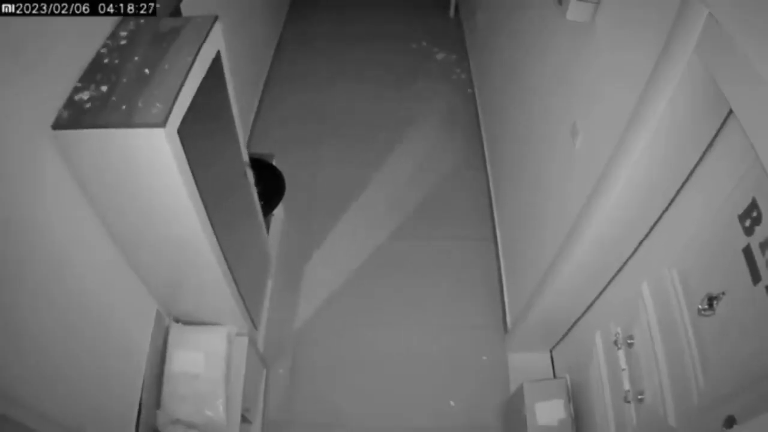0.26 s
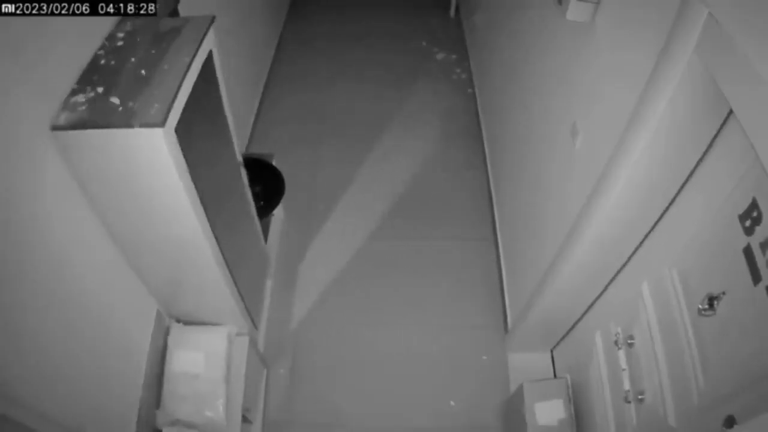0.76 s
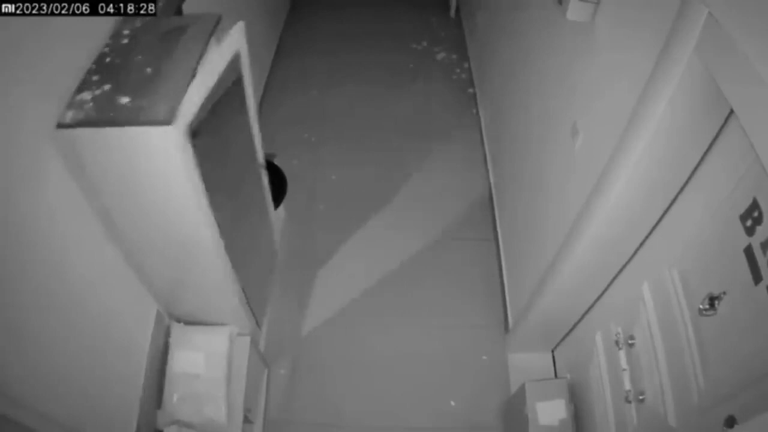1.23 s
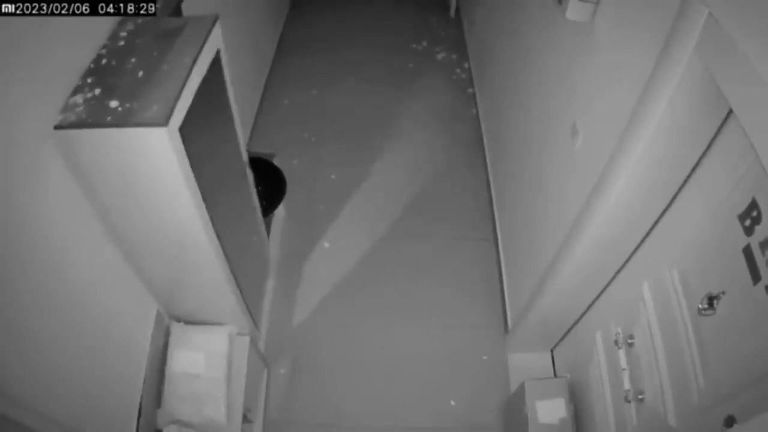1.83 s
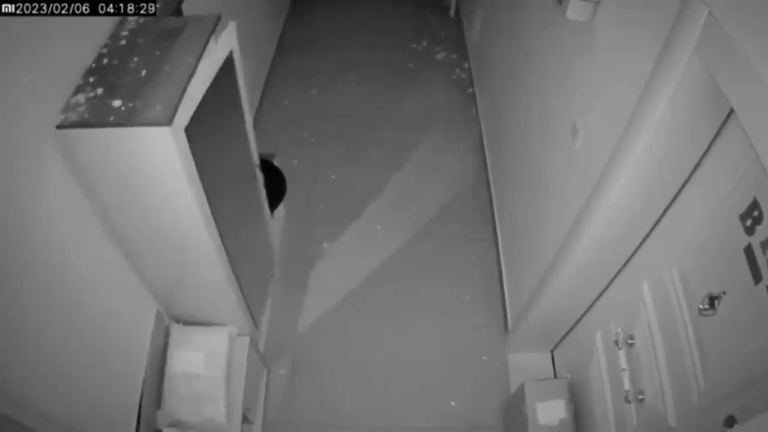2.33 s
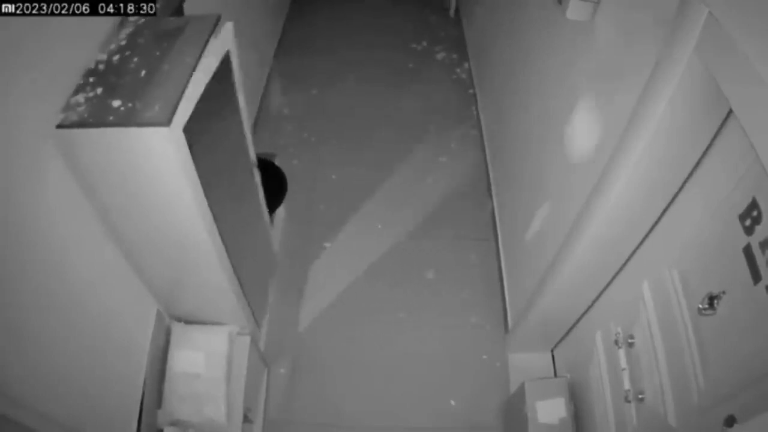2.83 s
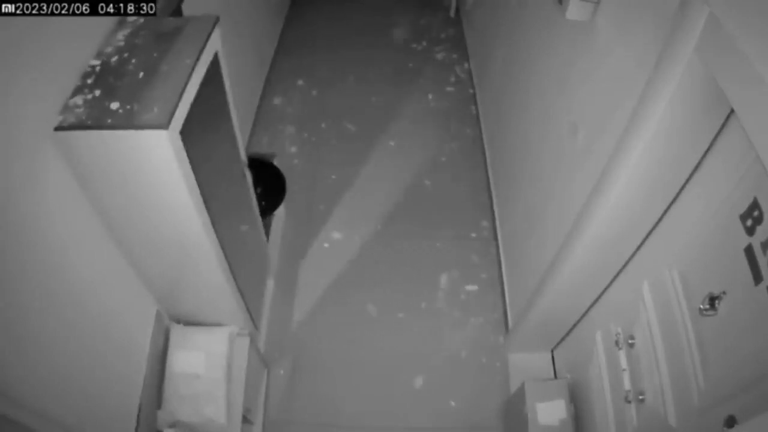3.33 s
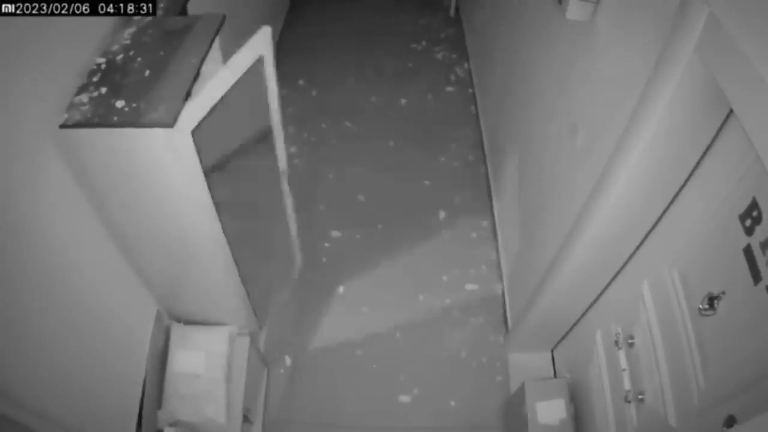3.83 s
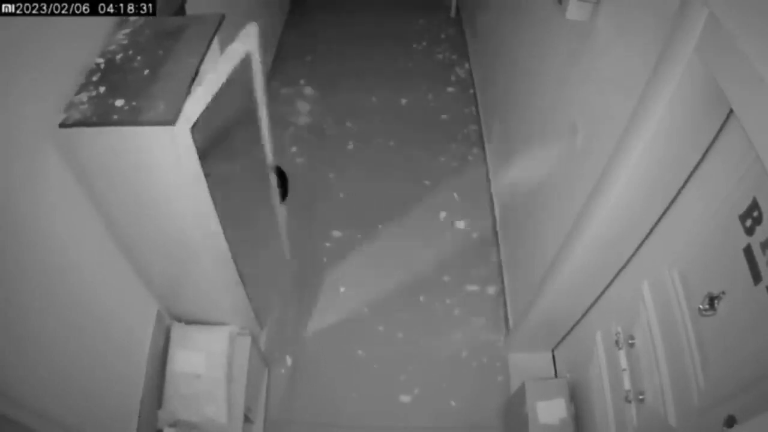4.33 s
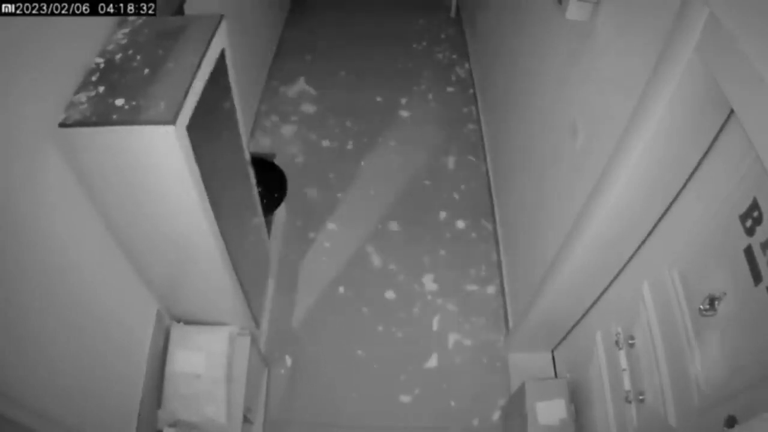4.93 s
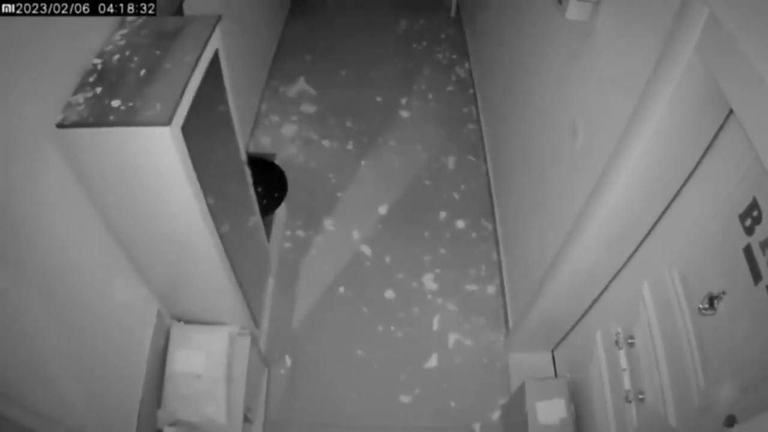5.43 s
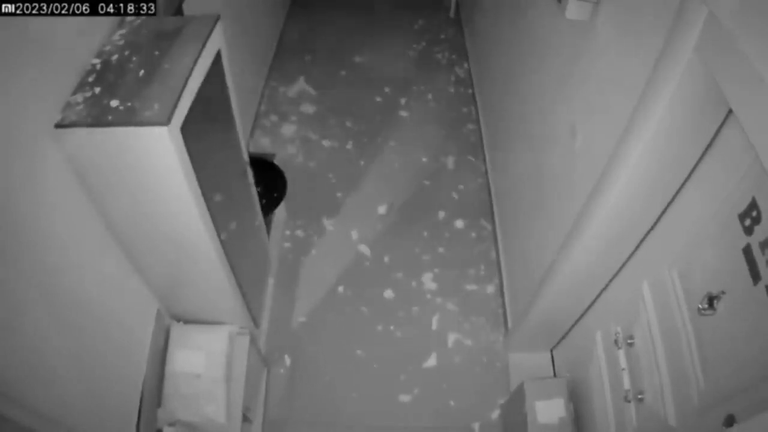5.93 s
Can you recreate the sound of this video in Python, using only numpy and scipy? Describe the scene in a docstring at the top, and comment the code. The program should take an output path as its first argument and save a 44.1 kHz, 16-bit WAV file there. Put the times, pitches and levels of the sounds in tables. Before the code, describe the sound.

A security camera in a bare, echoing hallway hears a strong earthquake. A dull thud and low rumble start at once, with loose doors and fittings rattling down the hall. Around 0.4 s the building lurches, plaster begins to crack and patter, and hard chips tick sharply nearby, again at 1.1 s. At 1.3 s furniture thuds and crashes against a wall; the hardest jolt hits at 1.7-1.9 s, booming, clattering and overloading the microphone. More heavy thuds follow near 2.4 and 3.0 s, with dry plaster snaps at 2.9 and 3.35 s and streams of crumbs. Bright ticks come at 3.65 and 4.3-4.5 s. Rumble eases somewhat, then a wide crash bursts at 4.7-4.85 s with long scraping. A sharp chip clicks at 5.3 s; a last lurch, thud, rattling and dragging scrapes run from 5.6 s to the end. Mono, band-limited, compressed.

```python
"""An earthquake in a hallway with bare walls, heard by a small mono security camera on the wall.
A thud and rumble open it: random jolts ring building modes, and lurches swell them, hardest at 1.7 s.
Filtered bursts of tiny contacts soon crack and pour plaster; decaying sines tick as chips land close by.
Furniture crashes come near 1.3, 1.8 and 4.7 s as wide bursts; long scrapes trail to the end.
Rattle and grit run throughout from the hall; the loudest jolts overload the camera's input."""
import sys
import numpy as np
from scipy import signal
from scipy.fft import rfft, irfft, next_fast_len
from scipy.io import wavfile

SR = 44100
rng = np.random.default_rng(int(sys.argv[2]) if len(sys.argv) > 2 else 0)


def wav_record(signal):
    """Record a signal, one row per channel, as 16-bit PCM in the file named by sys.argv[1]."""
    frames = np.transpose(np.atleast_2d(signal))
    bounded = np.clip(frames, -1, 1)
    # unit amplitude maps onto the largest positive 16-bit level
    quanta = np.round(bounded * 32767).astype(np.int16)
    wavfile.write(sys.argv[1], SR, quanta)


N = 272392  # samples, about 6.2 s

# Trembling between the lurches, walls and furniture against floor:
# time_s, walls_level_db, boom_level_db
TREMBLING = [(0, -24.5, -36.5), (.8, -35, -51.5), (.97, -30, -48), (1.22, -29, -39.5), (1.68, -37.5, -44.5),
             (2.15, -25, -35), (2.72, -22, -34.5), (2.88, -30.5, -41.5), (3.48, -37, -48.5),
             (3.75, -25.5, -38.5), (4.15, -33, -52.5), (4.65, -34, -47.5), (5.25, -38, -60),
             (5.55, -35, -49), (6.18, -32, -46)]
# Lurches of the building, floor boom relative to the walls:
# start_s, walls_level_db, hold_s, boom_over_walls_db
BUILDING_LURCHES = [(0.367, -26, .11, -3.5), (1.297, -24, 0.068, -6), (1.423, -26, 0.095, -16),
                    (1.732, -14, 0.22, -8.5), (2.289, -20.5, 0.13, -7), (2.458, -21.5, .03, -0.5),
                    (2.937, -21.5, 0.098, -2.5), (3.12, -22.5, 0.092, -8.5), (3.542, -22.5, 0.04, -11),
                    (4.383, -24.5, 0.036, -9), (5.615, -24, 0.029, -13), (5.824, -20.5, 0.079, -8.5)]
# Resonances of floor, walls and cabinet: centre_hz, width_hz, level_db
BUILDING_MODES = [(65.9, 1.5, 6), (82, 6.9, -11), (95, 14, -4.5), (114, 8.8, -4), (139, 31, 0.5),
                  (167.6, 1.7, -7), (183.3, 39, -2), (222.8, 18, 1.5), (251.3, 17, 3.5), (304, 75, 2.5),
                  (364, 17, -5.5), (410.7, 19, 1.5), (460, 96, -12.5), (714, 130, -12), (935, 130, -34)]
# Heavy blows of furniture and doors, level before a common trim, low roll-off of the blow:
# start_s, relative_level_db, t60_s, lowest_hz
HEAVY_THUDS = [(0, -10.5, 0.19, 150), (1.305, -9, 0.21, 83), (1.764, -6.5, 0.31, 100),
               (1.825, -16, 0.94, 40), (2.394, -7.5, 0.37, 210), (2.489, -15, 0.57, 18),
               (2.991, -15, 0.14, 37), (3.042, -11, 0.18, 61), (4.705, -9.5, 0.15, 230),
               (4.833, -13.5, 0.4, 49), (5.317, -17.5, 0.078, 120), (5.9, -15, 0.22, 120)]
# Furniture against the walls, level before a common trim:
# start_s, relative_level_db, centre_hz, t60_s
WALL_CRASHES = [(1.298, -4.5, 1360, .13), (1.77, -6, 2100, 0.18), (1.843, -14.5, 1424, 0.26),
                (4.704, -16.5, 1090, 0.2), (4.835, -6, 2440, 0.28)]
# Plaster and fittings cracking, plus two narrow ringing rows near 4.4 and 5.3 s where chips land and ring on,
# level before a common trim: # start_s, relative_level_db, centre_hz, width_octaves, t60_s
PLASTER_CRACKS = [(.181, -18, 2480, 0.24, 0.042), (0.611, -14, 2620, 3.1, 0.077),
                  (.613, -16, 1670, 0.24, 0.093), (.766, -17.5, 3500, 0.67, 0.19),
                  (0.944, -24, 2200, 0.21, .16), (.975, -28.5, 7100, 0.099, 0.33),
                  (1.397, -16.5, 2170, 0.62, 0.082), (2.315, -24.5, 4200, 1.6, 0.075),
                  (2.365, -14.5, 2750, 0.53, 0.041), (2.913, -9.5, 3550, 0.44, 0.058),
                  (2.956, -16, 3800, 0.38, 0.054), (3.162, -19, 5000, 0.35, 0.019),
                  (3.354, -10, 2380, 0.64, 0.11), (3.44, -18, 4000, 1.4, 0.17),
                  (3.598, -22.5, 2880, 1.5, .17), (4.053, -23.5, 5470, 0.59, 0.1),
                  (4.311, -19, 4500, 0.66, 0.052), (4.438, -20, 5400, .14, 0.25),
                  (4.821, -15, 3000, 0.17, 0.024), (5.165, -22.5, 2500, 0.63, .2),
                  (5.314, -20, 1800, 0.98, 0.064), (5.333, -22.5, 5000, 0.12, 0.23),
                  (5.798, -22, 3300, 1.2, 0.1)]
# Plaster pouring down, level before a common trim: start_s, relative_level_db, centre_hz
PLASTER_SPILLS = [(.363, -14.5, 6000), (.46, -22.5, 3000), (2.117, -20.5, 4000), (2.501, -23.5, 3650),
                  (2.693, -20.5, 3860), (2.863, -22, 4230), (3.2, -22.5, 2650), (3.72, -22.5, 3500),
                  (3.865, -21.5, 3280), (4.517, -18.5, 5400), (5.639, -24.5, 2430), (6.004, -19.5, 2750)]
# Furniture dragging over the floor, level before a common trim:
# start_s, relative_level_db, centre_hz, width_octaves, t60_s
FLOOR_SCRAPES = [(0.201, -23.5, 1806, 0.22, 0.092), (0.796, -25, 1830, 0.21, 0.22),
                 (1.42, -22.5, 1490, 0.48, 0.56), (3.43, -25, 1400, 0.3, .16),
                 (3.595, -23, 910, 0.32, 0.13), (4.33, -25, 1130, .4, 0.54),
                 (4.712, -17.5, 1950, 0.37, 0.32), (4.7, -21, 930, 0.088, 0.29),
                 (4.765, -20, 1000, 0.18, 0.62), (4.879, -20.5, 2060, .45, 1), (5.659, -23, 1790, .3, 1),
                 (5.8, -26.5, 1750, .25, .9), (6.03, -23.5, 2530, 0.39, 0.57),
                 (6.11, -22.5, 1670, 0.57, .65)]
# Hard chips landing close by: start_s, level_db, ring_hz, skitter_t60_s
HARD_CHIPS = [(0.382, -8.5, 5840, 0.0054), (0.393, -1, 5500, 0.0031), (1.092, 2.5, 6550, 0.04),
              (1.093, -9.5, 4630, 0.011), (3.652, 3, 5900, 0.018), (3.653, -4, 4000, 0.048),
              (4.314, -5.5, 4340, 0.0043), (4.438, -7.5, 5800, 0.0077), (4.537, -12, 5270, 0.0057),
              (5.327, 3.5, 4990, 0.024)]
# How hard loose doors and fittings chatter: time_s, level_db
CHATTER_LEVEL = [(0, -36.5), (.14, -39), (.35, -32), (.7, -31), (1.02, -31), (1.25, -31), (1.68, -33.5),
                 (2.05, -32.5), (2.5, -28), (2.84, -31.5), (3.32, -33.5), (3.55, -32), (3.96, -26),
                 (4.63, -30), (5.02, -25), (5.42, -37), (5.76, -23), (6.18, -38)]
# Colour of that chatter: frequency_hz, gain_db
CHATTER_COLOUR = [(100, -45), (250, -21.5), (450, -3), (700, -2.5), (950, 1.5), (1250, -2.5), (1850, 1.5),
                  (2800, -1), (4000, -7), (7000, -31)]
# How much fine plaster comes down: time_s, level_db
PLASTER_LEVEL = [(.13, -45), (.35, -31), (.75, -28), (1.05, -34), (1.35, -30.5), (1.62, -43), (2.05, -41),
                 (2.22, -32), (2.62, -33.5), (3.0, -29.5), (3.32, -36), (3.96, -29.5), (4.63, -34.5),
                 (5.05, -36), (5.46, -38.5), (5.68, -28), (5.97, -41), (6.18, -50)]
# Colour of the fine plaster: frequency_hz, gain_db
PLASTER_COLOUR = [(500, -55), (1200, -42), (2500, -7.5), (3600, 1), (5000, 2), (6300, 3.5), (7400, -10.5)]
# Reverberation of the hallway: frequency_hz, t60_s
HALL_DECAY = [(100, 0.54), (1000, 0.45), (3000, 0.39), (7000, 0.2)]
# Tone of the camera after its input, sloping down towards the treble: frequency_hz, gain_db
CAMERA_TONE = [(100, 1), (700, 1), (2000, -1), (5000, -2.5), (7000, -3)]

TOP_HZ = 7250  # upper edge of the camera's band and of the bursts
BOOM_TOP_HZ = 109  # the floor carries the modes below this, the walls those above
LURCH_RISE_S, LURCH_T60_S = 0.05, 0.45
# Rise as a share of the t60: longer blows also build up more slowly
THUD_RISE_SHARE, CRASH_RISE_SHARE, CRACK_RISE_SHARE = 0.018, 0.057, 0.021
CRASH_OCTAVES = 0.84
SPILL_RISE_S, SPILL_T60_S, SPILL_OCTAVES = 0.013, 0.36, 0.4
SCRAPE_RISE_S = 0.019
# Snap of the first contact against all the crumbs, and the rise time over which it fades
CRACK_SNAP, SNAP_FADE_S = 0.7, 0.0019
# After every break the larger pieces settle: later, lower, weaker and for longer
SETTLE_LAG_SHARE, SETTLE_PITCH_SHARE, SETTLE_STRETCH = 0.15, 0.65, 1.4
SETTLE_DB, SETTLE_RISE_S = -13, 0.0093


def amp(db):
    """Decibels to gain."""
    return 10 ** (np.asarray(db) / 20)


def unit(x):
    """Scale to rms 1."""
    return x / np.sqrt(np.mean(x ** 2) + 1e-20)


def along(points, hz):
    """Read (Hz, value) points on a log-frequency axis."""
    point_hz, values = np.transpose(points)
    return np.interp(np.log(hz + 1), np.log(point_hz), values)


def curves(rows):
    """One value per sample for each column after the time."""
    times, *columns = np.transpose(rows)
    return [np.interp(np.arange(N) / SR, times, column) for column in columns]


def filtered(x, response):
    """Multiply the spectrum of x by a response of frequency."""
    size = next_fast_len(len(x) + 8192)
    spectrum = rfft(x, size) * response(np.fft.rfftfreq(size, 1 / SR))
    return irfft(spectrum, size)[:len(x)]


def add(track, start, sound):
    """Mix a sound into the track at a start time in seconds."""
    part = track[max(round(start * SR), 0):][:len(sound)]
    part += sound[:len(part)]


def impacts(size, rate, scatter_db):
    """Tiny contacts at random moments, of random sign and strength, rms 1; rate in contacts per second."""
    chance = rng.random((3, size))
    hit = np.flatnonzero(chance[0] < rate / SR)
    sign = np.sign(chance[1, hit] - .5)
    out = np.zeros(size)
    out[hit] = sign * amp(scatter_db * np.pi * (2 * chance[2, hit] - 1) / 2)
    return unit(out)


def swell(t, rise, t60):
    """Envelope of a blow: a linear build-up, then an exponential decay."""
    return np.minimum(t / rise, 1) * amp(-60 * np.maximum(t - rise, 0) / t60)


def band(centre_hz, octaves):
    """A bell-shaped response on a log-frequency axis, cut off at TOP_HZ."""
    def response(hz):
        distance = np.log2((hz + 1) / centre_hz) / octaves
        return np.exp(-distance ** 2 / 4) * (hz < TOP_HZ)
    return response


def burst(envelope, response, rate, scatter_db, main_share):
    """One main contact amid a run of small ones rings a body; the result has the envelope's energy."""
    contacts = impacts(len(envelope), rate, scatter_db) * envelope
    contacts[np.argmax(envelope)] += main_share * np.sqrt(np.sum(envelope ** 2))
    return unit(filtered(contacts, response)) * np.sqrt(np.mean(envelope ** 2))


def crumble(centre_hz, octaves, rise, t60, snap):
    """A break is a burst of crumbs in one band; larger, lower pieces settle after it."""
    t = np.arange(SR // 2) / SR
    out = burst(swell(t, rise, t60), band(centre_hz, octaves), rate=2200, scatter_db=0, main_share=snap)
    settling = swell(t, SETTLE_RISE_S, SETTLE_STRETCH * t60)
    lower_band = band(SETTLE_PITCH_SHARE * centre_hz, octaves)
    pieces = burst(settling, lower_band, rate=1200, scatter_db=0, main_share=0)
    add(out, SETTLE_LAG_SHARE * t60, amp(SETTLE_DB) * pieces)
    return out


def structure(hz):
    """Summed resonances of the building; it radiates little below its lowest mode and damps the treble."""
    grid = np.arange(SR // 8)  # 1 Hz steps; silent above
    modes = sum(amp(db) * 1j * grid * width / (centre * centre - grid * grid + 1j * grid * width)
                for centre, width, db in BUILDING_MODES)
    radiation = grid ** 2 / (56 ** 2 - grid ** 2 + 1j * grid * 36)
    damping = 1 / (1 - (grid / 950) ** 2 + 1.4j * grid / 950)
    return np.interp(hz, grid, modes * radiation * damping, right=0)


def hallway(x, wet_db, count=5):
    """Direct sound plus the diffuse answer of bare walls, taking turns among several noise tails."""
    hz, t, z = signal.stft(rng.standard_normal((count, SR // 3)), SR, nperseg=256)
    decay = amp(-60 * t / along(HALL_DECAY, hz)[:, None])
    tails = signal.istft(z * decay, SR, nperseg=256)[1]
    tails = np.pad(tails / np.linalg.norm(tails[0]), ((0, 0), (SR // 250, 0)))  # 4 ms late
    turn = np.arange(N) // (SR // 64) % count  # a new tail every 1/64 s
    slices = x * (turn == np.arange(count)[:, None])
    wet = signal.oaconvolve(slices, tails, axes=1).sum(axis=0)[:N]
    return (x + amp(wet_db) * wet) / np.hypot(1, amp(wet_db))


def rumble():
    """Countless small jolts boom the floor and ring the walls; every lurch swells, holds and dies away."""
    t = np.arange(N) / SR
    walls_power, boom_power = amp(curves(TREMBLING)) ** 2
    for start, db, hold, boom_db in BUILDING_LURCHES:
        rise = np.clip((t - start) / LURCH_RISE_S, 0, 1)
        decay = amp(-60 * np.maximum(t - start - LURCH_RISE_S - hold, 0) / LURCH_T60_S)
        surge = amp(db) * rise * decay
        walls_power = walls_power + surge ** 2
        boom_power = boom_power + (amp(boom_db) * surge) ** 2

    def floor_share(hz):
        return 1 / np.sqrt(1 + (hz / BOOM_TOP_HZ) ** 8)

    def walls_share(hz):
        return np.sqrt(1 - floor_share(hz) ** 2)

    floor_jolts = impacts(N, rate=900, scatter_db=2.0)
    boom = filtered(floor_jolts, lambda hz: structure(hz) * floor_share(hz))
    wall_jolts = impacts(N, rate=700, scatter_db=0.0)
    walls = filtered(wall_jolts, lambda hz: structure(hz) * walls_share(hz))
    return np.sqrt(boom_power) * unit(boom) + np.sqrt(walls_power) * unit(walls)


def thuds():
    """Heavy furniture lands in a run of contacts; each blow excites the modes down to its own roll-off."""
    out, t = np.zeros(N), np.arange(SR // 2) / SR
    for start, db, t60, lowest_hz in HEAVY_THUDS:
        envelope = swell(t, THUD_RISE_SHARE * t60, t60)
        body = lambda hz: structure(hz) * hz ** 2 / (hz ** 2 + lowest_hz ** 2)
        boom = envelope * filtered(impacts(len(t), rate=2000, scatter_db=2.5), body)
        add(out, start, amp(db - 4.5) * unit(boom) * np.sqrt(np.mean(envelope ** 2)))
    return out


def crashes():
    """Furniture hits a wall and everything in it clatters over a wide band."""
    out = np.zeros(N)
    for start, db, centre_hz, t60 in WALL_CRASHES:
        clatter = crumble(centre_hz, CRASH_OCTAVES, CRASH_RISE_SHARE * t60, t60, snap=0)
        add(out, start, amp(db - 1) * clatter)
    return hallway(out, wet_db=-4)


def cracks():
    """Plaster and fittings break; the more sudden the break, the harder it snaps. A few narrow rows are chips
    that ring on as they land."""
    out = np.zeros(N)
    for start, db, centre_hz, octaves, t60 in PLASTER_CRACKS:
        rise = CRACK_RISE_SHARE * t60
        snap = CRACK_SNAP * np.exp(-rise / SNAP_FADE_S)
        add(out, start, amp(db + 3) * crumble(centre_hz, octaves, rise, t60, snap))
    return hallway(out, wet_db=-8)


def spills():
    """Loosened plaster pours down as a burst of crumbs without a snap."""
    out = np.zeros(N)
    for start, db, centre_hz in PLASTER_SPILLS:
        pour = crumble(centre_hz, SPILL_OCTAVES, SPILL_RISE_S, SPILL_T60_S, snap=0)
        add(out, start, amp(db + 2) * pour)
    return hallway(out, wet_db=-11.5)


def scrapes():
    """Shoved furniture slips over the floor in many small catches that die away."""
    out, t = np.zeros(N), np.arange(SR // 2) / SR
    for start, db, centre_hz, octaves, t60 in FLOOR_SCRAPES:
        envelope = swell(t, SCRAPE_RISE_S, t60)
        drag = burst(envelope, band(centre_hz, octaves), rate=2000, scatter_db=3.5, main_share=0)
        add(out, start, amp(db + 2) * drag)
    return hallway(out, wet_db=-4.5)


def chips():
    """A hard flake lands close by with one sharp ringing tick and skitters briefly."""
    out, t = np.zeros(N), np.arange(SR // 16) / SR
    for start, db, ring_hz, t60 in HARD_CHIPS:
        tick = np.sin(2 * np.pi * ring_hz * t) * swell(t, rise=0.00034, t60=0.0037)
        contacts = .05 * impacts(len(t), rate=3300, scatter_db=-4.0) * amp(-60 * t / t60)
        contacts[0] = 1  # the landing itself
        add(out, start, amp(db) * signal.fftconvolve(contacts, tick))
    return hallway(out, wet_db=-19.5)


def rattle():
    """Doors and fittings chatter further down the hall: random contacts, mostly reverberant."""
    level_db, = curves(CHATTER_LEVEL)
    chatter = hallway(impacts(N, rate=220, scatter_db=4.0), wet_db=5.5)
    return amp(level_db) * unit(filtered(chatter, lambda hz: amp(along(CHATTER_COLOUR, hz))))


def clacks(count=150):
    """Larger bits drop at random, each a short decaying note, louder where the rattle or grit is."""
    out, t = np.zeros(N), np.arange(SR // 40) / SR
    (rattle_db,), (grit_db,) = curves(CHATTER_LEVEL), curves(PLASTER_LEVEL)
    for when, size, strength in rng.random((count, 3)):
        pitch_hz = 6500 * (900 / 6500) ** size  # bigger pieces sound lower
        at = int(when * N)
        db = size * rattle_db[at] + (1 - size) * grit_db[at] + 10.5 + 9 * strength
        envelope = swell(t, rise=0.00049, t60=0.005 + 0.0028 * size)
        add(out, at / SR, amp(db) * np.sin(2 * np.pi * pitch_hz * t) * envelope)
    return hallway(out, wet_db=8.5)


def grit():
    """Fine plaster patters onto the floor as random contacts, mostly reverberant."""
    level_db, = curves(PLASTER_LEVEL)
    patter = hallway(impacts(N, rate=330, scatter_db=3.0), wet_db=4.0)
    return amp(level_db) * unit(filtered(patter, lambda hz: amp(along(PLASTER_COLOUR, hz))))


def scene():
    """Everything reaches one microphone, the same on both channels."""
    shaking = rumble() + thuds()
    loose_parts = rattle() + grit() + clacks()
    breaking = cracks() + spills()
    furniture = crashes() + scrapes()
    mono = shaking + loose_parts + breaking + furniture + chips()
    return np.array([mono, mono])


def overload(x, ceiling, hardness):
    """Rounded clipping of the input stage."""
    return x / (1 + np.abs(x / ceiling) ** hardness) ** (1 / hardness)


def gain_control(x, knee_db, seconds):
    """The gain sinks as the recent power rises, and recovers after it."""
    keep = np.exp(-1 / (seconds * SR))
    power = signal.lfilter([1 - keep], [1, -keep], x ** 2)
    return x / np.sqrt(1 + power / amp(knee_db) ** 2)


def record(dry):
    """The camera clips, turns loud passages down, softens the treble slightly and cuts above TOP_HZ."""
    clipped = overload(dry[0], ceiling=.58, hardness=6)
    held = gain_control(clipped, knee_db=-11, seconds=0.19)
    # the second factor is a gentle 20 Hz low cut
    toned = filtered(held, lambda hz: amp(along(CAMERA_TONE, hz)) * 1j * hz / (20 + 1j * hz))
    mono = filtered(toned, lambda hz: 1 / np.sqrt(1 + (hz / TOP_HZ) ** 140))
    return np.array([mono, mono])


dry = scene()
out = record(dry)
wav_record(out)
```